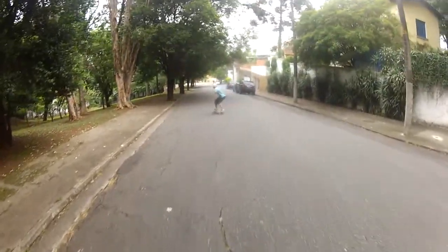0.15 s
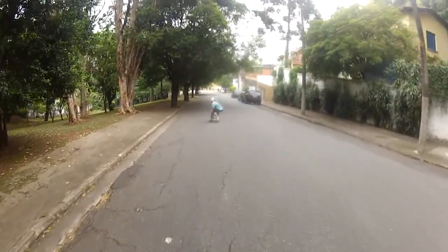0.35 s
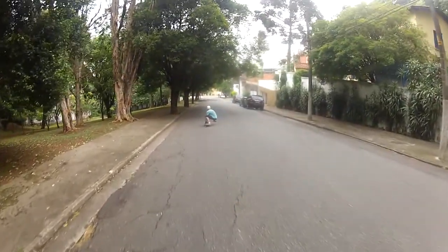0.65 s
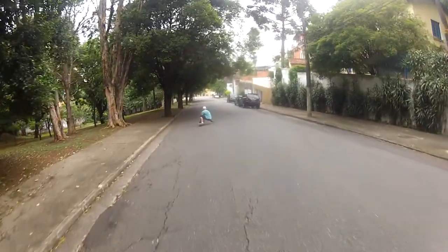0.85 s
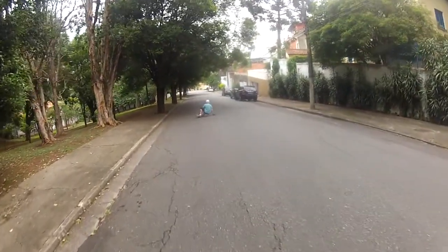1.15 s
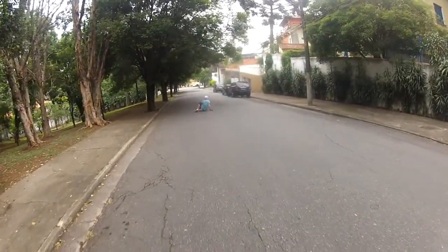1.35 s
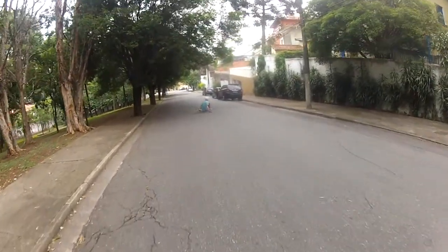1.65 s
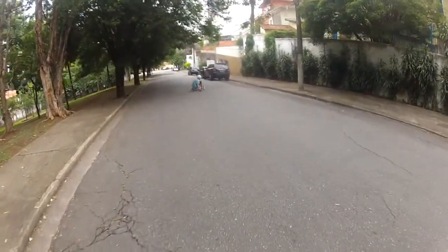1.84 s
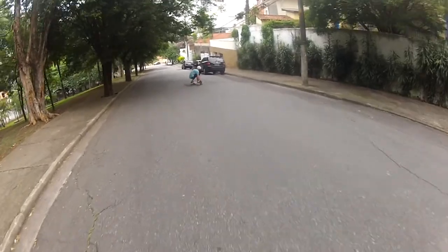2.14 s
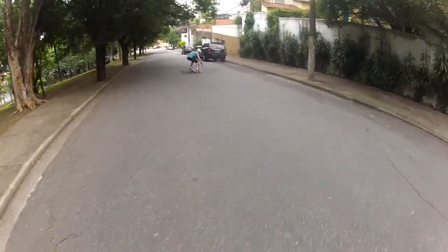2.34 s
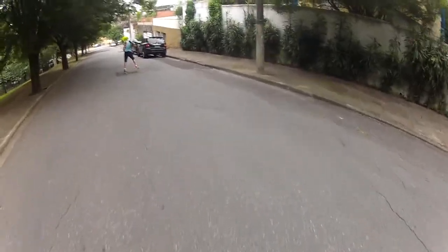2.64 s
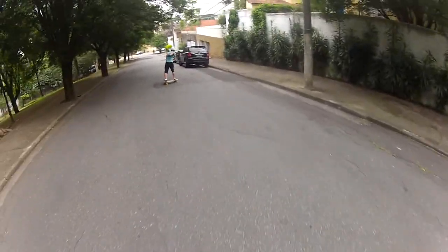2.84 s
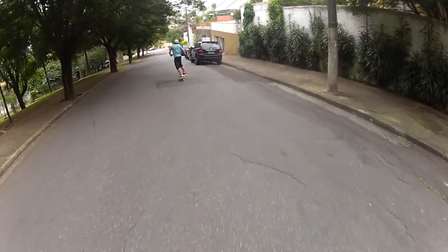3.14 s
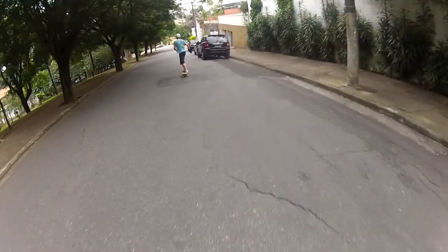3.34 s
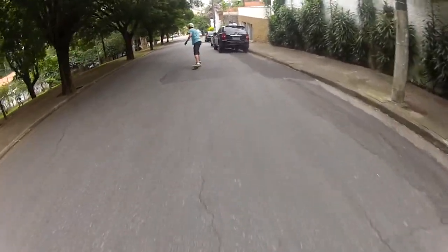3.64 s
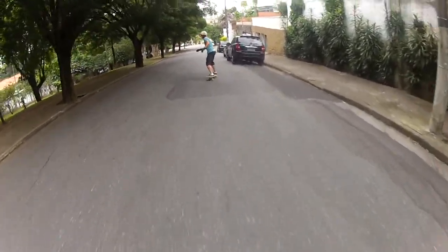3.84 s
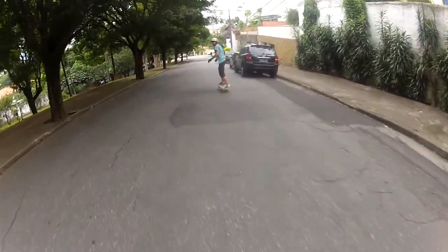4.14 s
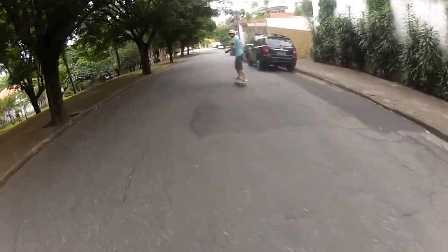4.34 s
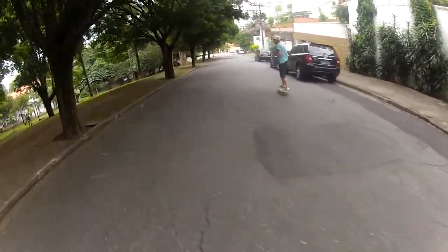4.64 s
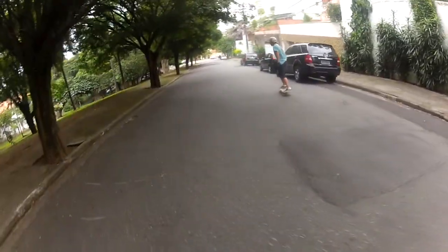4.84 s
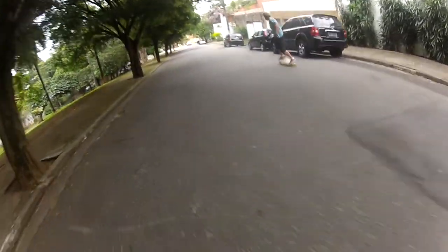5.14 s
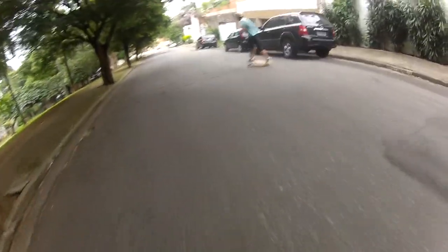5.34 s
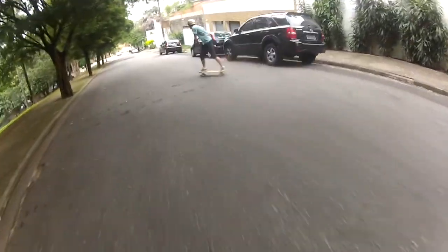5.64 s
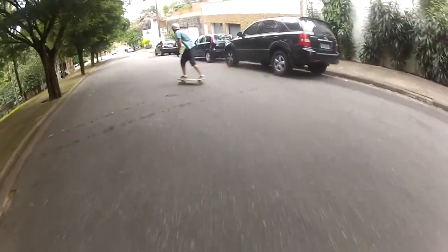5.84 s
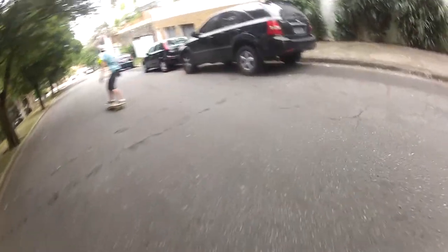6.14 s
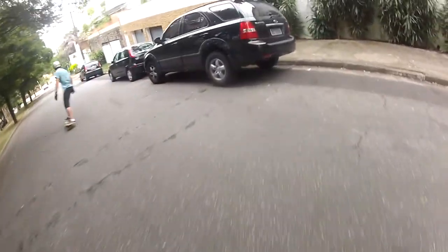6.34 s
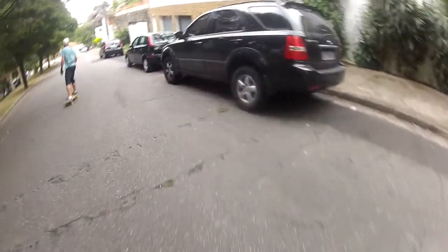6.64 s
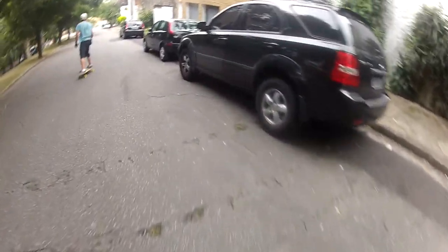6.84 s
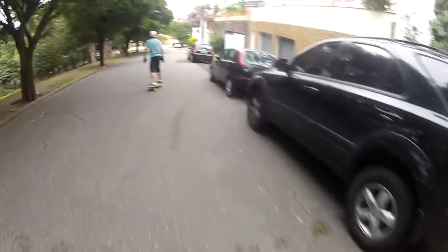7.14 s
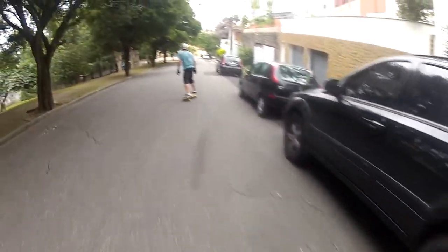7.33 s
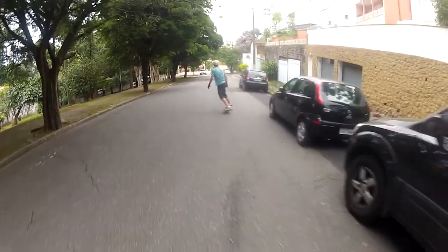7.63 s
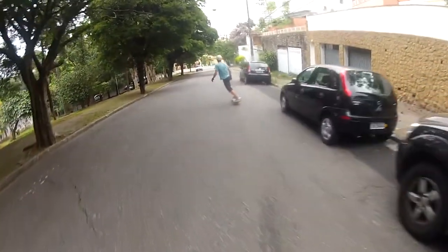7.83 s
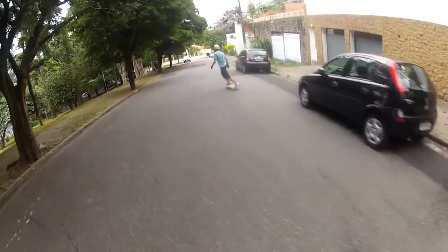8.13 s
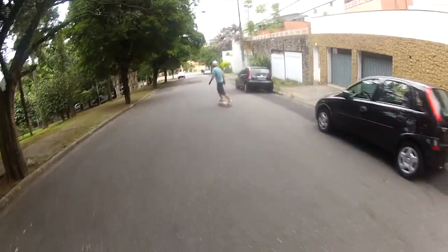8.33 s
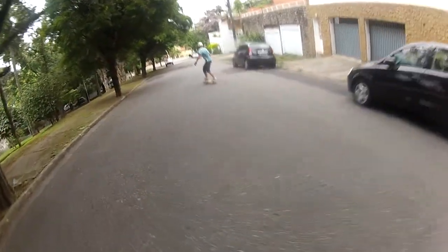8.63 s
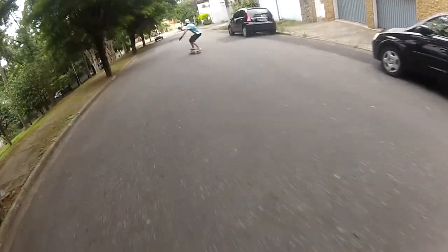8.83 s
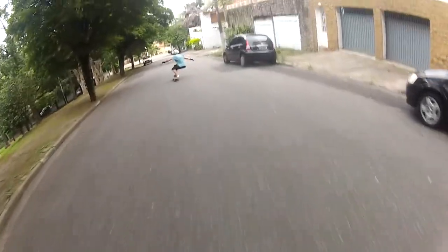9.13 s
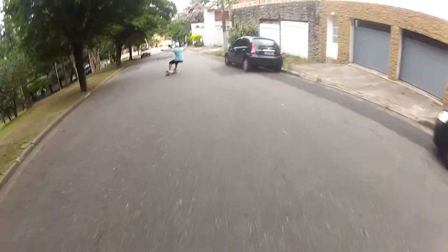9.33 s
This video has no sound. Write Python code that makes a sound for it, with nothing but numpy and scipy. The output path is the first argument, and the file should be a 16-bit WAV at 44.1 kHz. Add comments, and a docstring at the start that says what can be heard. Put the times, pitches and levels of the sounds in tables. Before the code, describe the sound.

A skateboard's rough rumble on asphalt runs for about nine and a half seconds, heard from on board, with wind buffeting the microphone and a thin, high sizzle on top. During the first three seconds another skater's slides hiss faintly ahead. The board knocks over a crack at 2 seconds, and a stone snaps sharply at 2.4. Rumble and wind grow with speed, and from about 4 seconds the surface sounds grittier, with strong gusts, small stone clicks, light scrubbing and two rattling knocks near 4.4. Between 5.6 and 6.2 seconds the wheels knock again and skid sideways with a rasping chatter and slight squeal. The rolling continues, swelling in each turn. Faint birds chirp from 7 to 8 seconds. More knocks come at 7.6, 7.9 and 9.3, with strong gusts around 8 and 8.5 and brief light skids near the end.

```python
"""A skateboard's rough rumble is heard from on board, with crackling grit, knocks and rasping skids.
The asphalt drives board and camera case into forced vibration; sideways, the wheels stick and slip.
Eddies buffet the microphone, a second skater ahead hisses in braking slides, and birds call from trees.
The camera samples slowly and holds each value, which mirrors the spectrum into a thin, high sizzle."""
import sys
import numpy as np
from scipy import signal
from scipy.fft import rfft, irfft, next_fast_len
from scipy.io import wavfile
from scipy.ndimage import map_coordinates

SR = 44100
rng = np.random.default_rng(int(sys.argv[2]) if len(sys.argv) > 2 else 0)


def transcribe(signal):
    """Save signal, clipped to [-1, 1], as a 16-bit WAV file at the path in sys.argv[1]."""
    frames = np.atleast_2d(signal).T
    limited = np.clip(frames, -1, 1)
    pcm = np.round(limited * 32767).astype(np.int16)
    wavfile.write(sys.argv[1], SR, pcm)


N = 418068

# spectrum of the distant trees: f/Hz, level/dB
RUSTLE_SPECTRUM = [(2000, -21), (3800, 4), (5400, -3.5), (6000, -16)]
# one bird's chirps and another's whistles: t/s, duration/s, top f/Hz, level/dB
CHIRPS = [(7.025, .025, 5850, -52), (7.112, .018, 5350, -55), (7.152, .02, 5650, -54),
          (7.243, .056, 5500, -47.5), (7.347, .026, 5550, -51), (7.563, .024, 5800, -56),
          (7.694, .048, 5250, -50.5)]
WHISTLES = [(0, 0.18, 3650, -51.5), (.115, .1, 3480, -56), (7.87, 0.2, 4260, -50.5)]
# contours of an arched and a drooping note: fractions of duration, of top f, of amplitude
ARCH = [(0, .78, .2), (.12, .94, .8), (.24, 1, 1), (.5, .94, 1), (.75, .86, .9), (1, .79, .1)]
DROOP = [(0, .97, .7), (.3, 1, .9), (.75, .99, 1), (1, .89, .4)]
# slides of the skater ahead: t/s, attack/s, duration/s, level/dB, decay/(dB/s)
SLIDES = [(0, .02, 1.3, -55, -0.5), (0.96, 0.37, 1.3, -42.5, 7.5), (2.78, 0.027, .25, -41, 131)]
# spectrum of sliding friction: f/Hz, level/dB
SLIDE_SPECTRUM = [(400, -31), (1000, -4.5), (1600, -3.5), (3000, -1.5), (3500, -8), (4500, -11),
                  (6000, -24.5)]

# spectra of small and of large eddies: f/Hz, level/dB
SMALL_EDDY_SPECTRUM = [(30, -27), (70, -14.5), (130, -2.5), (230, -3), (330, -3.5), (480, -14), (700, -10),
                       (1000, -30), (2000, -68.5)]
LARGE_EDDY_SPECTRUM = [(12, -25), (28, -10), (55, 1.5), (100, 0), (170, -4.5), (400, -23), (1000, -68)]
# gusts on the camera: peak t/s, duration/s, gain/dB
GUSTS = [(1.716, 0.43, 5), (2.343, 0.43, 2), (2.95, 0.76, 2), (4.256, .5, 6), (4.875, 0.93, 7.5),
         (5.616, 0.24, 3.5), (6.6, 0.45, 1.5), (7.98, 0.43, 8), (8.523, 0.78, 8)]
# the board's speed downhill: t/s, fraction of top speed
SPEED = [(0, .54), (1.3, 0.66), (2.65, 0.69), (3.6, .88), (5.6, 0.99), (5.95, 0.7), (6.45, 0.66),
         (7.35, 0.74), (8.25, 0.66), (9.48, 0.83)]
# turns press the wheels harder: apex t/s, lean-in/s, let-go/s, gain/dB
TURNS = [(.26, 0.071, 0.12, 8), (1.0, 0.44, 0.89, 3.5), (2.25, 0.41, 0.3, 8), (3.45, 0.54, 0.18, 2.5),
         (4.33, 0.88, 0.34, 4.5), (5.25, 0.45, 0.62, 1.5), (6.03, 0.38, 0.33, 10), (6.97, 0.41, 0.24, 5.5),
         (7.78, 0.46, 0.41, 6.5), (8.8, 0.39, 0.28, 5), (9.38, 0.42, .35, 6.5)]
# the wheels scrub sideways: t/s, duration/s, tread gain/dB
SKIDS = [(4.216, 0.14, 4), (4.726, .8, 3.5), (5.591, 0.14, 8.5), (5.794, 0.261, 9), (6.058, .11, 3),
         (8.67, 0.21, 3), (9.216, .25, 2.5)]

# stones snap under the wheels; the rows at 5.049, 5.3, 5.348 and 5.891 s are short rasps of the scrubbing
# wheels: t/s, level/dB, f/Hz, T60/s
STONES = [(.498, -34, 4330, 0.013), (2.018, -26, 2340, 0.017), (2.3797, -6.5, 890, 0.013),
          (2.3837, -16.5, 2530, 0.0087), (2.798, -27.5, 2970, 0.023), (4.328, -15, 2740, 0.0077),
          (4.347, -28.5, 5320, 0.012), (5.049, -24, 2450, .025), (5.3, -24.5, 2500, .022),
          (5.348, -23.5, 2350, 0.017), (5.643, -32.5, 4500, .045), (5.745, -21, 2180, .014),
          (5.891, -24, 2380, .022), (6.34, -34, 2900, 0.032), (7.646, -33, 2820, 0.021),
          (7.874, -22.5, 1430, .0086), (8.382, -41, 4300, 0.014), (8.66, -36.5, 4500, .013),
          (9.285, -27.5, 4400, .014)]
# the wheels drop into cracks: t/s, level/dB
BUMPS = [(2.017, -6), (3.35, -9.5), (4.358, -4.5), (4.442, -2.5), (5.614, -2.5), (5.746, -0.5), (7.647, -2),
         (7.873, -1), (9.285, -0.5)]
# spectrum of crackling grit: f/Hz, level/dB
GRIT_SPECTRUM = [(400, 3), (900, 7), (1200, 2.5), (1900, -2.5), (2300, -0.5), (2750, -2), (3050, -1.5),
                 (3400, -8), (3900, -4.5), (4500, -13), (5200, -16.5), (6000, -24.5)]
# resonances: f/Hz, bandwidth/Hz, gain/dB
TRUCK_MODES = [(2650, 375, 2), (2860, 480, -1.5)]  # loose hardware
CHATTER_MODES = [(1280, 760, -8), (2366, 280, -1), (4250, 150, -16)]  # urethane pushed sideways
CASE_MODES = [(261, 144, -10), (438, 87, -3), (541, 96.6, 1), (642, 270, -11)]  # wheels and camera case
DECK_MODES = [(198.6, 30.4, -1.5), (426.4, 33, 1.5)]  # bending of the board
STRAIN_MODES = [(650, 120, 1), (870, 154, -7), (930, 110, -10)]  # higher board modes, excited under load
# the board's drone: t/s, level/dB relative to the roar of wheels and case
DRONE_LEVEL = [(0, -.5), (1.6, 2), (3.2, -4.5), (4.2, 2), (4.7, -11.5), (6.0, -7.5), (6.5, -0.5), (7.8, -3),
               (8.3, -3), (9.48, -6.5)]

AIR_DB, AIR_DB_PER_DOUBLING = -21, 10  # reference level at top speed, growth with speed
ROLL_DB, ROLL_DB_PER_DOUBLING = -19.5, 12.5  # likewise for the rumble
TREAD_DB, TREAD_GROWTH = -45.5, 0.78  # reference level, dB per dB of wheel load
COARSE_S, COARSE_BLEND_S, COARSE_DB = 3.91, 0.37, 5  # the asphalt turns coarser
SKID_ATTACK_S, SKID_RELEASE_S, SKID_RUMBLE_SHARE = 0.045, 0.038, 0.27
SQUEAL_HZ, SQUEAL_WIDTH_HZ = 2325, 36
CEILING, HOLD_HZ, CLOCK_HZ, TOP_HZ = .94, 12000, 48000, 15300


def amp(db):
    """Amplitude ratio of a level in decibels."""
    return 10 ** (np.asarray(db) / 20)


def unit(x):
    """Normalisation to rms 1."""
    return x / np.sqrt(np.mean(x ** 2) + 1e-20)


def curve(rows):
    """Linear interpolation of (t/s, value) rows at every sample."""
    return np.interp(np.arange(N) / SR, *np.transpose(rows))


def wobble(rate):
    """Smooth random modulation: a spline through rate knots per second."""
    knots = rng.standard_normal(int(N * rate / SR) + 4)
    return map_coordinates(knots, [np.arange(N) * rate / SR])


def hump(peak_s, rise_s, fall_s):
    """Cosine envelope from 0 to 1 and back."""
    u = np.interp(np.arange(N) / SR, [peak_s - rise_s, peak_s, peak_s + fall_s], [-1, 0, 1])
    return np.cos(u * np.pi / 2)


def gate(start_s, length_s, attack_s, release_s):
    """Trapezoidal envelope whose release begins after length_s."""
    t = np.arange(N) / SR - start_s
    return np.clip(np.minimum(t / attack_s, 1 + (length_s - t) / release_s), 0, 1)


def add(track, s, sound):
    """Superposition of a sound on the track at time s."""
    start = max(round(s * SR), 0)
    track[start:start + len(sound)] += sound[:N - start]


def filtered(x, response):
    """Linear filtering: the spectrum is multiplied by a frequency response."""
    size = next_fast_len(len(x) + 8192)
    hz = np.fft.rfftfreq(size, 1 / SR)
    return irfft(rfft(x, size) * response(hz), size)[:len(x)]


def coloured(x, spectrum):
    """Spectral shaping by (f/Hz, level/dB) points on a log axis, at rms 1."""
    f, db = np.transpose(spectrum)
    return unit(filtered(x, lambda hz: amp(np.interp(np.log(hz + 1), np.log(f), db))))


def resonate(x, modes):
    """Modal superposition: x drives damped resonators of alternating polarity."""
    def response(f):
        return sum((-1) ** k * amp(db) * 1j * f * width / (centre ** 2 - f ** 2 + 1j * f * width)
                   for k, (centre, width, db) in enumerate(modes))
    return filtered(x, response)


def through_wheels(blows, modes, cutoff_hz=740):
    """Vibration isolation: blows excite the modes, but the soft wheels pass little treble."""
    return signal.sosfilt(signal.butter(4, cutoff_hz, fs=SR, output="sos"), resonate(blows, modes))


def impacts(rate, spread_db):
    """Shot noise: random blows of uneven size, rate per second, at rms 1."""
    hits = rng.random(N) < rate / SR
    return unit(hits * rng.standard_normal(N) * amp(spread_db * rng.standard_normal(N)))


def speed_doublings():
    """Speed in doublings from top speed; a power law is linear in dB on this scale."""
    return np.log2(np.maximum(curve(SPEED), .1))


def bird(notes, contour):
    """Frequency and amplitude modulation: each pure tone follows the contour, a little unsteadily."""
    drift, flutter = 1 + .009 * wobble(300), amp(1.5 * wobble(120))
    fraction, pitch, strength = np.transpose(contour)
    track = np.zeros(N)
    for s, length, top_hz, db in notes:
        u = np.linspace(0, 1, round(length * SR))
        now = max(round(s * SR), 0) + np.arange(len(u))
        hz = top_hz * np.interp(u, fraction, pitch) * drift[now]
        envelope = np.interp(u, fraction, strength) * signal.windows.tukey(len(u), .15) * flutter[now]
        add(track, s, amp(db) * envelope * np.sin(2 * np.pi * np.cumsum(hz) / SR))
    return track


def trees(rustle_db=-68):
    """Incoherent addition: many leaves merge into steady noise behind two birds."""
    rustle = amp(rustle_db) * coloured(rng.standard_normal(N), RUSTLE_SPECTRUM)
    return rustle + bird(CHIRPS, ARCH) + bird(WHISTLES, DROOP)


def skater_ahead(release_s=0.2):
    """Sliding friction radiates a broadband hiss that fades as the wheels slow."""
    t = np.arange(N) / SR
    envelope = sum(gate(s, length, attack, release_s) * amp(db - decay * np.maximum(t - s - attack, 0))
                   for s, attack, length, db, decay in SLIDES)
    return envelope * coloured(rng.standard_normal(N), SLIDE_SPECTRUM)


def wind(lump_db=1.77, large_db=-17, large_growth=0.57):
    """Turbulent pressure on the microphone grows with speed and in gusts, most for small eddies."""
    gust_db = sum(db * hump(s, length / 2, length / 2) for s, length, db in GUSTS)
    air_db = AIR_DB + AIR_DB_PER_DOUBLING * speed_doublings() + gust_db
    small_gain = amp(air_db - 1.5 + lump_db * wobble(22))
    small_eddies = small_gain * coloured(rng.standard_normal(N), SMALL_EDDY_SPECTRUM)
    large_gain = amp(large_db + large_growth * air_db + lump_db * wobble(14))
    large_eddies = large_gain * coloured(rng.standard_normal(N), LARGE_EDDY_SPECTRUM)
    return small_eddies + large_eddies


def stones(crack_gain=0.46, attack_cycles=0.26):
    """Damped free vibration: each stone, or short rasp of the wheels, rings briefly, with a crack of noise
    around its pitch."""
    track, t = np.zeros(N), np.arange(SR // 10) / SR
    for s, db, hz, t60 in STONES:
        envelope = amp(db - 60 * t / t60) * (1 - np.exp(-t * hz / attack_cycles))
        spectrum = [(hz / 2, -12), (hz, 0), (2 * hz, -14), (10 * hz, -60)]
        crack = coloured(rng.standard_normal(len(t)), spectrum)
        add(track, s, envelope * (np.sin(2 * np.pi * hz * t) + crack_gain * crack))
    return track


def bumps(rattle_db=-28, rattle_t60=0.031):
    """Impulse response: each crack in the road knocks board and case and shakes the trucks."""
    track, t = np.zeros(N), np.arange(SR // 10) / SR
    knock = through_wheels(signal.unit_impulse(len(t)), CASE_MODES + DECK_MODES)
    knock /= np.abs(knock).max()
    rattle_envelope = amp(rattle_db - 60 * t / rattle_t60)
    for s, db in BUMPS:
        rattle = rattle_envelope * unit(resonate(rng.standard_normal(len(t)), TRUCK_MODES))
        add(track, s, amp(db) * (knock + rattle))
    return track


def tread(slip, crackle_db=0.5, judder_db=2.5, rattle_db=-9, squeal_db=-4.5):
    """Stick-slip friction: as slip rises, crackle yields to chatter and squeal over rattling trucks."""
    grit_gain = amp(1.5 + crackle_db * wobble(220))
    grit = grit_gain * coloured(impacts(rate=6000, spread_db=2), GRIT_SPECTRUM)
    rattle = amp(rattle_db) * unit(resonate(impacts(rate=280, spread_db=-2), TRUCK_MODES))
    # the urethane grips and lets go in short rasping bursts
    bursts = amp(judder_db * wobble(75)) * impacts(rate=2500, spread_db=0.5)
    chatter = amp(-1) * unit(resonate(bursts, CHATTER_MODES))
    squeal_mode = [(SQUEAL_HZ, SQUEAL_WIDTH_HZ, 0)]
    squeal = amp(squeal_db) * unit(resonate(impacts(rate=1200, spread_db=7), squeal_mode))
    return np.sqrt(1 - slip) * grit + rattle + np.sqrt(slip) * chatter + slip * squeal


def contact_levels():
    """Contact excitation in dB grows with speed and load; coarse road and skids raise mainly the tread."""
    turn_db = sum(db * hump(s, lean, let_go) for s, lean, let_go, db in TURNS)
    load_db = ROLL_DB_PER_DOUBLING * speed_doublings() + turn_db
    coarse_db = COARSE_DB * np.clip((np.arange(N) / SR - COARSE_S) / COARSE_BLEND_S, 0, 1)
    skid_db = sum(db * gate(s, length, SKID_ATTACK_S, SKID_RELEASE_S) for s, length, db in SKIDS)
    rumble_db = ROLL_DB + load_db + SKID_RUMBLE_SHARE * skid_db
    tread_db = TREAD_DB + TREAD_GROWTH * load_db + coarse_db + skid_db
    return rumble_db, tread_db


def wheels(texture_db=1.5, half_slip_db=-34, strain_db=-6):
    """Forced vibration: the asphalt's grain shakes board and case, beneath the noise of the tread."""
    rumble_db, tread_db = contact_levels()
    # coarse and smooth patches modulate rumble and tread together
    patch_db = texture_db * unit(wobble(35) + wobble(130))
    # slip follows the tread level: 0 in free rolling, 1 in hard scrubbing
    slip = 1 / (1 + amp(2.02 * (half_slip_db - tread_db)))
    roar = unit(through_wheels(impacts(rate=4000, spread_db=2), CASE_MODES))
    drone_gain = amp(curve(DRONE_LEVEL))
    drone = drone_gain * unit(through_wheels(impacts(rate=4000, spread_db=0.5), DECK_MODES))
    strain_ring = unit(through_wheels(impacts(rate=3000, spread_db=2), STRAIN_MODES, cutoff_hz=1080))
    strain = amp(strain_db) * np.sqrt(slip) * strain_ring
    rumble = (roar + drone + strain) / np.hypot(1, 0.58 * drone_gain)  # partly offsets the drone's power
    return amp(rumble_db + patch_db) * rumble + amp(tread_db + patch_db) * tread(slip)


def scene():
    """Free-field superposition: all sources add at one microphone in the open air."""
    return (wind() + wheels() + skater_ahead() + bumps() + stones() + trees())[None]


def record(dry):
    """Zero-order hold: steps between slow samples mirror the spectrum around the sampling rate."""
    limited = np.clip(dry[0], -CEILING, CEILING)
    smooth = filtered(limited, lambda hz: hz < HOLD_HZ / 2)
    hold_ticks = CLOCK_HZ // HOLD_HZ
    samples = signal.resample_poly(smooth, CLOCK_HZ, SR)[::hold_ticks]
    steps = signal.resample_poly(np.repeat(samples, hold_ticks), SR, CLOCK_HZ)[:N]
    return filtered(steps, lambda hz: hz < TOP_HZ)[None]


dry = scene()
out = record(dry)
transcribe(out)
```